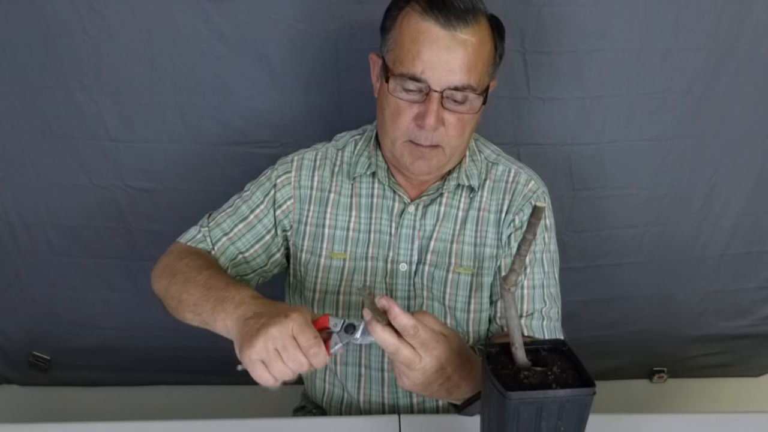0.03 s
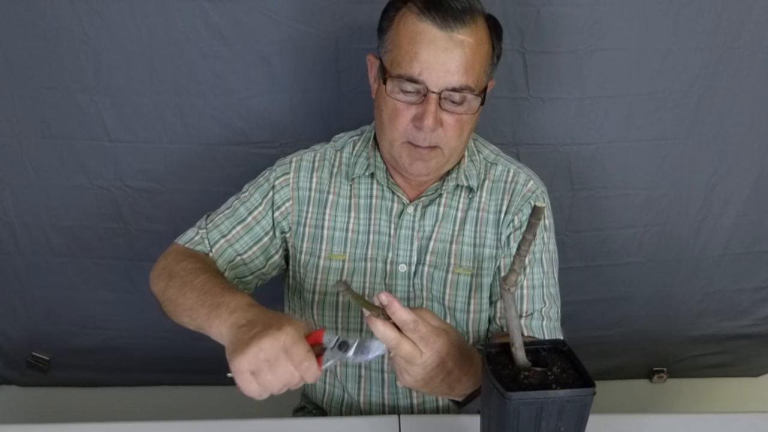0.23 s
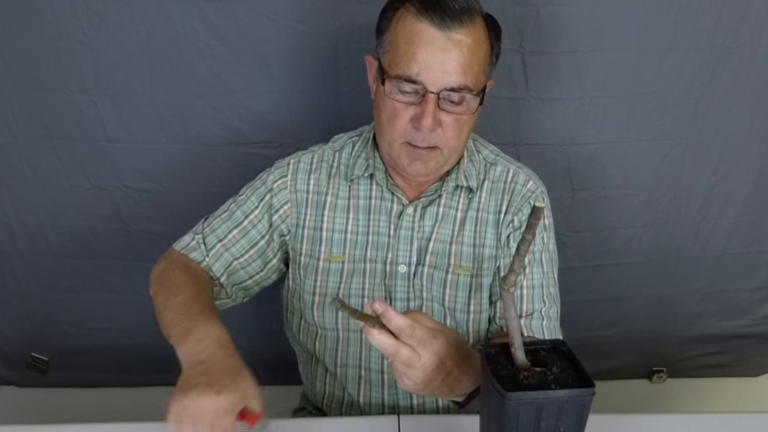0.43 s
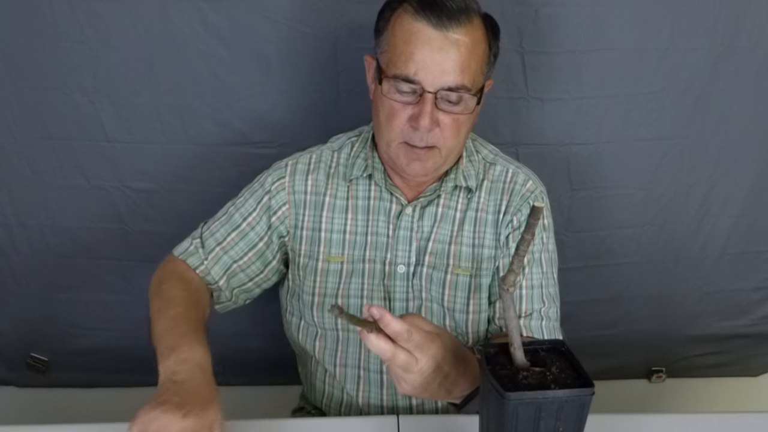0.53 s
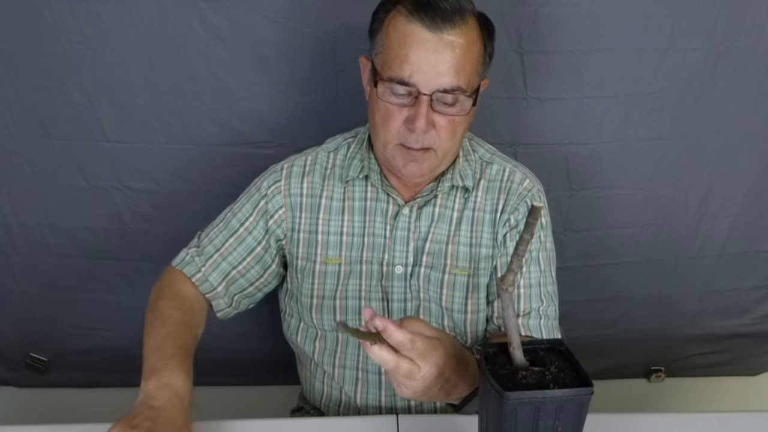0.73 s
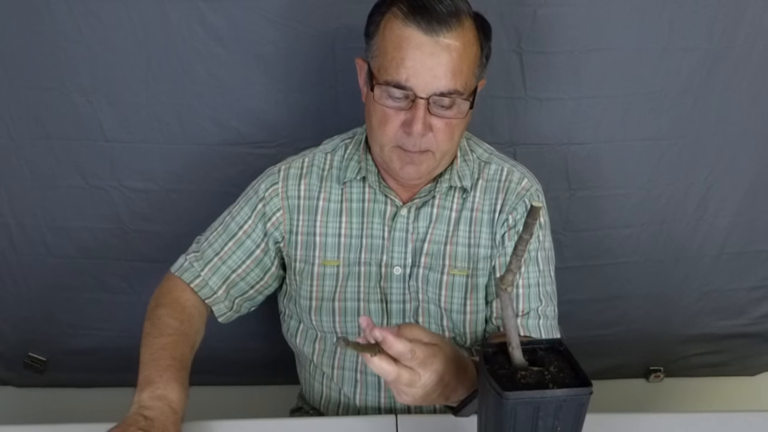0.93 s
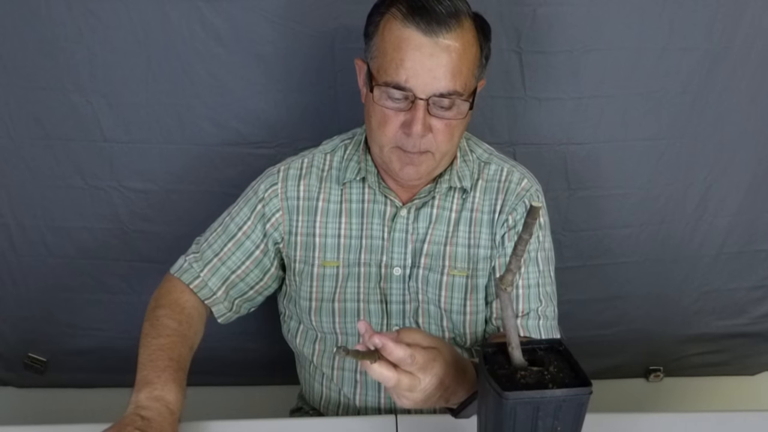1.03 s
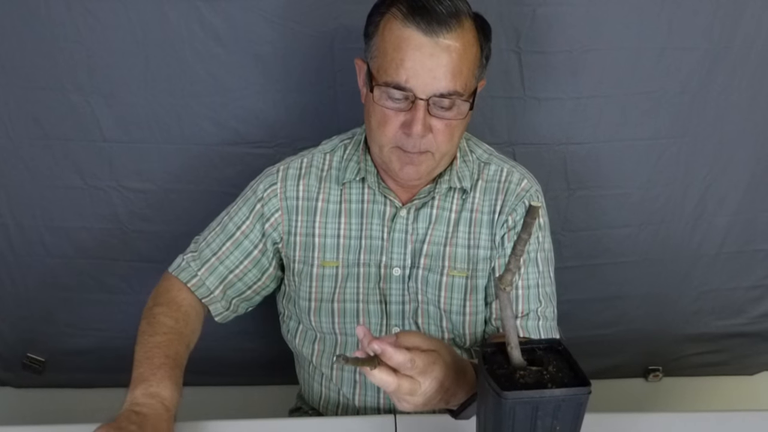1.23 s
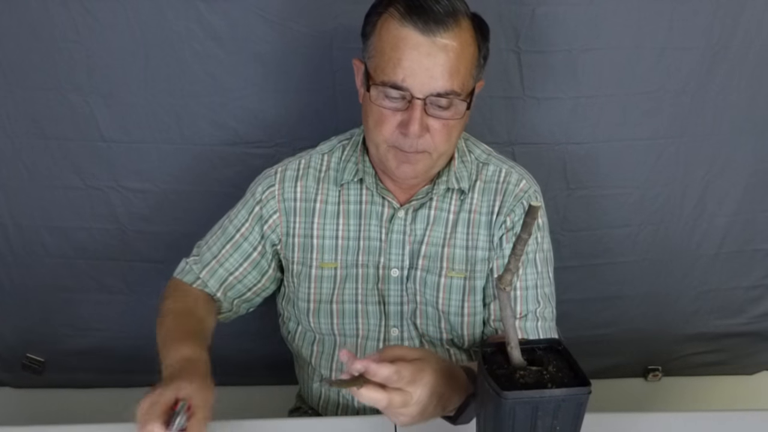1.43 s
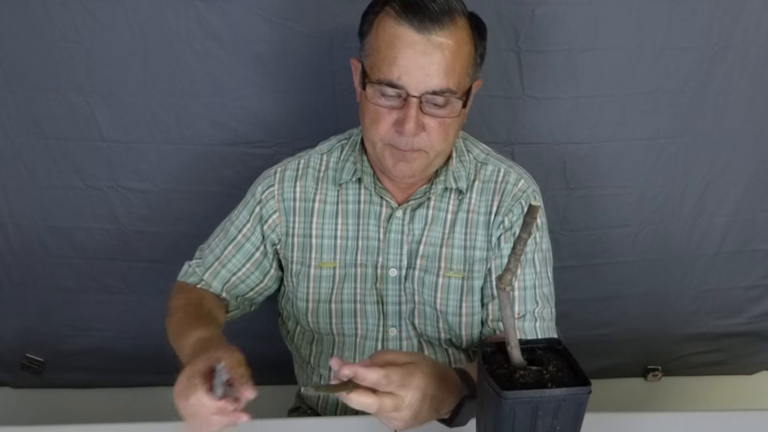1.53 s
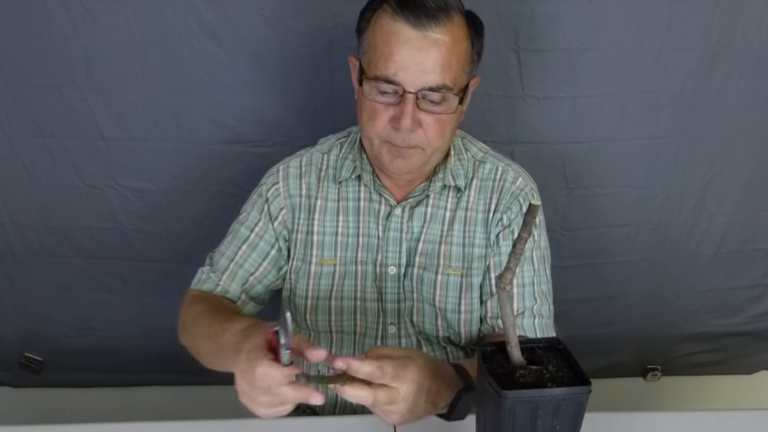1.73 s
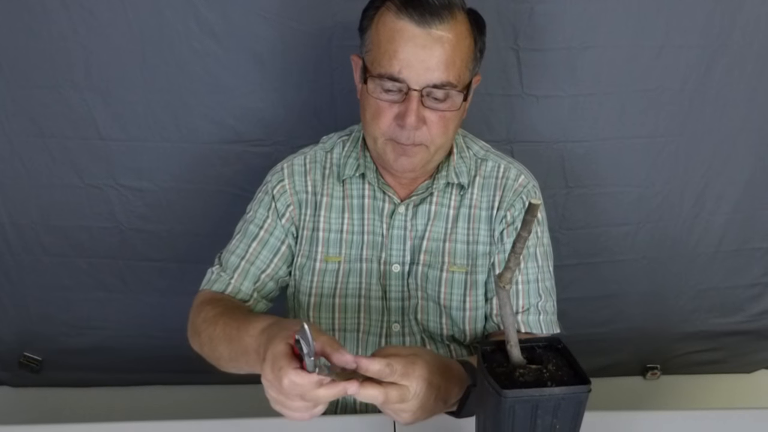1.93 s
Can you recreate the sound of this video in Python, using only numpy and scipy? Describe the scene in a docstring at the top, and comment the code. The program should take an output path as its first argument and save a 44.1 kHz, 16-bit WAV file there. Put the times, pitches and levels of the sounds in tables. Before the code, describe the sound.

Hand shears cut a woody cutting: a faint crackly bite at 0.08 seconds, a brief fibre crunch, then a loud, sharp metallic snap at 0.25 with a bright room echo. Around 1.0 the tool lands on a light hollow table with soft knocks; a faint knock at 1.2, a dull scraping drag around 1.35-1.45, then a small knife click at 1.54. Quiet ventilation and hiss throughout, close microphone.

```python
"""A bare, echoing room: hand shears bite into a woody cutting and snap shut, the tool is laid on
a light hollow table, a knife is dragged off it and clicks open; faint room noise below.
Steel contacts are noise bursts plus decaying sines; the crushed fibres are rough noise.
Knocks and random slips ring the table resonances, grit hisses with the slips, and decaying
noise bands echo tools and table; the air is wavering noise bands."""
import sys
import numpy as np
from scipy import signal
from scipy.fft import rfft, irfft
from scipy.io import wavfile
from scipy.ndimage import uniform_filter1d

SR = 44100
rng = np.random.default_rng(int(sys.argv[2]) if len(sys.argv) > 2 else 0)


def store_wav(level_fs):
    """Save 16-bit WAV to argv[1]."""
    pcm = np.round(np.clip(np.atleast_2d(level_fs), -1, 1) * 32767)
    wavfile.write(sys.argv[1], SR, pcm.T.astype(np.int16))


def volts_from_db(level):
    """Convert decibel levels to linear amplitude ratios."""
    exponent = np.asarray(level, float) / 20
    return 10 ** exponent


N = 88200


def rms_one(x):
    """Scales to rms 1."""
    return x / np.sqrt(np.mean(x ** 2) + 1e-20)


def at_hz(points, hz):
    """Reads a frequency table, linear in log frequency."""
    table_hz, values = np.transpose(points)
    return np.interp(np.log(hz), np.log(table_hz), values)


def in_time(rows):
    """Level columns over time, -120 dB outside the table."""
    s, *columns = np.transpose(rows)
    return [np.interp(np.arange(N) / SR, s, c, left=-120, right=-120) for c in columns]


def low_pass(x, hz):
    """Third-order low-pass: dulls the treble."""
    return signal.sosfilt(signal.butter(3, hz, fs=SR, output="sos"), x)


def cut(x, hz, kind="high"):
    """Fourth-order high- or low-pass."""
    return signal.sosfilt(signal.butter(4, hz, kind, fs=SR, output="sos"), x)


def soften(x, hz):
    """Double one-pole low-pass: a soft contact."""
    r = np.exp(-2 * np.pi * hz / SR)
    return signal.lfilter([(1 - r) ** 2], [1, -2 * r, r * r], x)


def ring(clicks, hz, t60_s):
    """Two-pole resonator: a unit click starts a decaying sine of height 1."""
    r, w = volts_from_db(-60 / (t60_s * SR)), 2 * np.pi * hz / SR
    return signal.lfilter([0, np.sin(w)], [1, -2 * r * np.cos(w), r * r], clicks + 1e-18)


def coloured(spectrum):
    """Mono noise of a given spectrum, rms 1."""
    hz = np.arange(N // 2 + 1) * SR / N + 1
    white = rfft(rng.standard_normal(N))
    return rms_one(irfft(white * volts_from_db(at_hz(spectrum, hz)), N))


def bands(likeness):
    """Third-octave bands of stereo noise, with their centres; likeness sets mid against side."""
    edges_hz = 25 * 2 ** np.arange(0, 9.4, 1 / 3)
    white = rng.standard_normal((2, 2, N))
    for k, (low, high) in enumerate(zip(edges_hz, edges_hz[1:])):
        band_pass = signal.butter(2, [low, high], "band", fs=SR, output="sos")
        mid, side = signal.sosfilt(band_pass, white[k % 2])
        hz = np.sqrt(low * high)
        alike = np.clip(at_hz(likeness, hz), -1, 1)
        yield hz, np.sqrt(1 + alike) * mid + np.sqrt(1 - alike) * side * [[1], [-1]]


def drift(rate_hz):
    """Slow low-passed chance, spread 1, drawn every 40 samples."""
    r = np.exp(-80 * np.pi * rate_hz / SR)
    slow = signal.lfilter([1], [1, -2 * r, r * r], rng.standard_normal(N // 40 + 2002))
    slow = slow[2000:]  # drop the start-up
    return np.interp(np.arange(N) / 40, np.arange(len(slow)), rms_one(slow))


# air spectrum: (frequency [Hz], relative density [dB per Hz])
AIR_SPECTRUM = [(25, -25.5), (50, -24), (85, -15), (120, -2.5), (155, -9), (200, 1), (320, -2.5), (500, -7),
                (800, -8), (1300, -14.5), (2500, -16), (5000, -20.5), (10000, -22), (13000, -31),
                (15500, -49)]
# air stereo: (frequency [Hz], left-right likeness [-1..1])
AIR_ALIKE = [(40, 0.62), (120, 0.33), (300, 0.78), (800, 0.2), (2500, 0.059), (8000, 0.27), (15000, 0.41)]
AIR_DB, AIR_PATCHY_DB = -56.5, 1.3


def air():
    """Low ventilation rumble and microphone hiss: noise bands, each wavering a little."""
    together = drift(2.5)
    noise = 0
    for hz, band in bands(AIR_ALIKE):
        waver_db = AIR_PATCHY_DB * (.5 * together + drift(8))
        noise = noise + volts_from_db(at_hz(AIR_SPECTRUM, hz) + waver_db) * band
    return volts_from_db(AIR_DB) * rms_one(noise)


# crack noise: (frequency [Hz], relative density [dB per Hz])
CRACK_SPECTRUM = [(300, -33), (1000, 0.5), (2000, 2), (2500, -5.5), (4000, -7), (5500, -7), (8500, -9.5),
                  (11000, -6.5), (14000, -12.5), (16000, -16.5)]
STRENGTH_SPREAD_DB, PHASE_SPREAD_RAD = 1.5, .6
RING_RISE_S, TILT_FROM_HZ = .0007, 1500
TABLE_ECHO_S, TABLE_ECHO_DB = .0062, -28


def contacts(clicks, modes):
    """Each contact is a short crack and sets every resonance ringing; the table throws it back once."""
    t = np.arange(2400) / SR
    each = len(clicks), len(modes)
    phase = np.pi * np.arange(len(modes)) + PHASE_SPREAD_RAD * rng.standard_normal(each)
    chance_db = STRENGTH_SPREAD_DB * rng.standard_normal(each)
    out, crack = np.zeros(N), coloured(CRACK_SPECTRUM)
    for k, (s, ring_db, crack_db, burst_s, tilt) in enumerate(clicks):
        i = int(s * SR)
        shape = np.minimum(t / .0003, 1) * np.exp(-2 * t / burst_s)
        burst = shape * crack[i:i + len(t)]
        even = np.sqrt(np.sum(shape ** 2) / np.sum(burst ** 2))
        out[i:i + len(t)] += volts_from_db(crack_db) * even * burst
        for m, (hz, mode_db, t60_s) in enumerate(modes):
            fall = (1 - np.exp(-t / RING_RISE_S)) ** 2 * volts_from_db(-60 * t / t60_s)
            tilt_db = tilt * np.log2(max(hz, TILT_FROM_HZ) / 3000)
            level = volts_from_db(ring_db + mode_db + tilt_db + chance_db[k, m])
            out[i:i + len(t)] += level * fall / fall.max() * np.sin(2 * np.pi * hz * t + phase[k, m])
    lag = int(TABLE_ECHO_S * SR)
    return out + volts_from_db(TABLE_ECHO_DB) * np.concatenate([np.zeros(lag), out[:-lag]])


# blade contacts: (time [s], ring level [dB], crack level [dB], burst [s], tilt [dB per octave])
BITES = [(.0790, -42, -39, .006, 4), (.0812, -37.5, -43, .006, -4), (.0860, -40, -44, .008, 2.5),
         (.0925, -42.5, -43, .012, -6.5), (.1015, -44.5, -49, .008, -2.5)]
# wood resonances: (frequency [Hz], level [dB], t60 [s])
WOOD_MODES = [(1230, 5, .014), (1900, -4, .012), (2650, -11, .01), (3785, -8, 0.0084), (4465, -1.5, .005),
              (6540, -11, 0.0033), (11300, -6, 0.0012), (14800, -6, .003)]


def bites():
    """The blade's first bite: small contacts ring the wood."""
    return contacts(BITES, WOOD_MODES)


# decay: (frequency [Hz], t60 [s])
ROOM_T60 = [(120, 0.63), (400, 0.6), (1200, 0.6), (2300, 0.74), (5000, 0.62), (8000, 0.53), (12000, 0.26)]
# colour: (frequency [Hz], relative level [dB])
ROOM_COLOUR = [(120, -10), (400, 4.5), (1200, 2), (2300, 3.2), (3500, 3), (5000, 1.5), (8000, 4),
               (10000, 2.5), (12000, 3.5)]
# stereo: (frequency [Hz], left-right likeness [-1..1])
ROOM_ALIKE = [(100, 1), (300, 1), (800, 0.19), (2000, 0.71), (5000, .8), (12000, 0.2)]
ROOM_ONSET_S = 0.0014


def room(x):
    """Dense reflections that build quickly and die band by band, equally strong on both sides."""
    t, tail = np.arange(N) / SR, 0
    for hz, band in bands(ROOM_ALIKE):
        onset = np.clip(t / ROOM_ONSET_S - .5, 0, 1)
        fall = volts_from_db(-60 * t / at_hz(ROOM_T60, hz)) * onset
        energy = np.sum((fall * band) ** 2, axis=1, keepdims=True)
        even = np.sqrt(hz * np.sum(fall ** 2) / energy)
        tail = tail + volts_from_db(at_hz(ROOM_COLOUR, hz)) * even * fall * band
    tail = tail / np.sqrt(np.sum(tail ** 2) / 2)  # unit energy per side
    return signal.fftconvolve(x[None], tail, axes=1)[:, :N]


# blade creeping through the fibres: (time [s], level [dB])
CRUSH = [(.2, -66), (.222, -44), (.235, -35.5), (.244, -32.5), (.247, -22), (.25, -82)]


def crush():
    """Fibres crackle under the blade: crack noise with a rough random envelope."""
    crush_db, = in_time(CRUSH)
    rough = rms_one(uniform_filter1d(rng.exponential(1, N) ** 2, size=90))
    return volts_from_db(crush_db) * coloured(CRACK_SPECTRUM) * rough


# steel contacts: (time [s], ring level [dB], crack level [dB], burst [s], tilt [dB per octave])
SNAP_CLICKS = [(.2474, -21, -16, 0.0048, 0.5), (.2490, -20, -22, 0.005, -0.5), (.2538, -8.5, -4, 0.0018, 4),
               (.2585, -21, -17.5, 0.0044, -5.5), (.2608, -21, -19, .003, -3.5),
               (.2640, -23.5, -26, .003, -4), (.2660, -24.5, -25, .005, -7)]
# blade and handle resonances: (frequency [Hz], level [dB], t60 [s])
SHEARS_MODES = [(272, -2.5, 0.048), (401, 3, 0.017), (600, 1.5, 0.022), (713, 0, 0.013), (849, 3.5, 0.02),
                (1292, 0.5, 0.005), (1680, -4, 0.00971), (1907, 0.5, 0.009), (2276, -2, .007),
                (2475, -1.5, 0.0046), (3393, -4.5, .005), (4083, -12, .004), (5002, -4, 0.0065),
                (5587, -9.5, .004), (6640, -12, .003), (7970, -21.5, .003), (10000, -11.5, .0025)]


def snap():
    """The shears snap shut: steel contacts ring blades and handles."""
    return contacts(SNAP_CLICKS, SHEARS_MODES)


# treble puffs: (time [s], level [dB], half-length [s])
RUSTLES = [(0.82, -65, 0.0085), (1.31, -72, 0.011), (1.446, -61, 0.039)]


def rustles():
    """Short soft puffs of high noise."""
    t = np.arange(N) / SR
    band_pass = signal.butter(2, (5400, 10600), "band", fs=SR, output="sos")
    hiss = rms_one(signal.sosfilt(band_pass, rng.standard_normal(N)))
    return hiss * sum(volts_from_db(db) * np.exp(-((t - s) / half_s) ** 2) for s, db, half_s in RUSTLES)


SLIPS_PER_S, SLIP_SPREAD_DB = 1700, 2


def slip_clicks():
    """A steady random stream of slips of either sign."""
    happens = rng.random(N) < SLIPS_PER_S / SR
    strength = volts_from_db(SLIP_SPREAD_DB * np.minimum(rng.exponential(1, N), 3))
    return happens * strength * rng.choice([-1, 1], N)


# table-top resonances: (frequency [Hz], level [dB], t60 [s])
TABLE_MODES = [(146.4, -11, 0.28), (206.1, -10, 0.44), (265, 2, 0.046), (323.6, -2.5, 0.075),
               (382, -3, 0.031), (495.6, -6, 0.031), (545.5, 0, 0.023), (676, -9.5, 0.069),
               (810, -7.5, 0.02), (1250, -49, 0.0089)]


def table_rings(force):
    """A force on the table top rings all its resonances."""
    return sum(ring(volts_from_db(db) * force, hz, t60_s) for hz, db, t60_s in TABLE_MODES)


# hand and tools rubbing on the table: (time [s], level [dB], grit level [dB])
DRAG = [(.978, -33.5, -57), (.99, -38, -56), (1.03, -40.5, -59.5), (1.065, -43.5, -61), (1.1, -51, -65.5),
        (1.17, -60, -66.5), (1.2, -40, -63), (1.23, -52.5, -68), (1.3, -45, -67.5), (1.335, -50, -60),
        (1.352, -32, -47), (1.375, -25.5, -38.5), (1.40, -29.5, -52.5), (1.445, -35.5, -48),
        (1.48, -59, -55), (1.56, -47, -56.5), (1.62, -71, -64)]
SLIP_SOFT_HZ, RUB_EVEN_HZ = 883, 24.7


def rub(slips):
    """Softened slips ring the table, evened out so that the level follows the drag."""
    drag_db, _ = in_time(DRAG)
    force = soften(slips, SLIP_SOFT_HZ)
    steady = table_rings(force)
    power_ahead = soften(steady[::-1] ** 2, RUB_EVEN_HZ)[::-1]
    return table_rings(force * volts_from_db(drag_db) / np.sqrt(power_ahead + 0.033 * steady.var()))


# grit noise: (frequency [Hz], relative density [dB per Hz])
GRIT_SPECTRUM = [(500, -1), (1000, 3.5), (2200, 0), (3600, -2), (5500, -14), (9000, -23.5), (13000, -43)]


def grit(slips):
    """Noise hisses with each slip."""
    _, grit_db = in_time(DRAG)
    gate = rms_one(soften(np.abs(slips), hz=99.5))
    return volts_from_db(grit_db) * gate * coloured(GRIT_SPECTRUM)


# knocks: (time [s], level [dB], most responsive frequency [Hz], tick level [dB])
KNOCKS = [(0.9783, -33.5, 350, -61), (0.9932, -36.5, 337, -80), (1.007, -33, 280, -67),
          (1.191, -40.5, 354, -73), (1.356, -30, 310, -56)]
THUD_PEAK_S = 0.0029


def thuds():
    """Each knock is first a short swelling thud at its own pitch."""
    out = 0
    for s, db, hz, _ in KNOCKS:
        age = np.maximum(np.arange(N) / SR - s, 0)
        swell = (age / THUD_PEAK_S * np.exp(1 - age / THUD_PEAK_S)) ** 2
        out = out + volts_from_db(db) * swell * np.sin(2 * np.pi * hz * age)
    return out


TABLE_RINGS_DB, KNOCK_FALL_DB_PER_OCT, KNOCK_SOFT_HZ = -10.5, 11, 540


def knock_rings():
    """Soft knocks ring the table resonances, most those near each knock's own pitch."""
    out = 0
    for hz, _, t60_s in TABLE_MODES:
        knocks = np.zeros(N)
        for s, db, centre_hz, _ in KNOCKS:
            fall_db = KNOCK_FALL_DB_PER_OCT * abs(np.log2(hz / centre_hz))
            knocks[int(s * SR)] = volts_from_db(db + TABLE_RINGS_DB - fall_db)
        push = np.gradient(soften(knocks, KNOCK_SOFT_HZ)) * SR / (2 * np.pi * hz)
        out = out + ring(push, hz, t60_s)
    return out


def ticks():
    """Each knock adds a decaying tick of grit noise."""
    starts, fall_s = np.zeros(N), 0.0072
    for s, _, _, tick_db in KNOCKS:
        starts[int(s * SR)] = volts_from_db(tick_db)
    return signal.lfilter([1], [1, -np.exp(-1 / (fall_s * SR))], starts) * coloured(GRIT_SPECTRUM)


def table():
    """Rubbing, grit and knocks on the table top; one stream of slips drives rub and grit."""
    slips = slip_clicks()
    return rub(slips) + grit(slips) + thuds() + knock_rings() + ticks()


# knife contacts: (time [s], ring level [dB], crack level [dB], burst [s], tilt [dB per octave])
KNIFE_CLICKS = [(1.5370, -34.5, -35, 0.0013, 0.11), (1.5430, -44, -36.5, 0.0029, 0.1)]
# knife resonances: (frequency [Hz], level [dB], t60 [s])
KNIFE_MODES = [(1206, 6.5, 0.075), (1970, 5.5, 0.015), (2530, -1, 0.0056), (3330, -2.5, 0.0037),
               (4080, 3, 0.0023), (4870, -2.5, 0.0023), (6430, -4, 0.0017), (9040, -13, 0.00078)]
KNIFE_DULL_HZ = 8250


def knife():
    """The duller knife clicks open."""
    return low_pass(contacts(KNIFE_CLICKS, KNIFE_MODES), KNIFE_DULL_HZ)


GAP_HZ, GAP_SHARPNESS, SNAP_TOP_HZ = 1050, 8.2, 13100
STEEL_CUT_HZ, STEEL_BASS_DB = 2197, -25.5


def steel():
    """Shears and knife; both radiate little below the blade resonances."""
    closing = low_pass(snap() + crush(), SNAP_TOP_HZ)
    # nothing radiates between handle and blade resonances
    closing = signal.lfilter(*signal.iirnotch(GAP_HZ, GAP_SHARPNESS, SR), closing)
    both = bites() + closing + knife()
    return cut(both, STEEL_CUT_HZ) + volts_from_db(STEEL_BASS_DB) * cut(both, STEEL_CUT_HZ, "low")


# tool balance: (frequency [Hz], left minus right [dB])
TOOL_BALANCE = [(1000, 0), (2000, 0), (4500, 2), (8000, 2), (12000, -4.5), (16000, -3.5)]
STEEL_LOW_HZ, TABLE_LOW_HZ = 230, 158
TOOLS_ROOM_DB, TABLE_ROOM_DB = -5, -8


def scene():
    """Tools and table near the microphone, their echo, the air; little comes through below a few hundred hertz."""
    tools = cut(steel(), STEEL_LOW_HZ)
    top = cut(table(), TABLE_LOW_HZ) + rustles()
    near = tools + room(volts_from_db(TOOLS_ROOM_DB) * tools)
    lean_db = at_hz(TOOL_BALANCE, np.arange(N // 2 + 1) * SR / N + 1) / 2
    sides = irfft(rfft(near) * volts_from_db(lean_db * [[1], [-1]]), N)
    return sides + top + room(volts_from_db(TABLE_ROOM_DB) * top) + air()


def band_limit(x):
    """A steep low-pass at the top of the band."""
    return signal.sosfilt(signal.butter(12, 16450, fs=SR, output="sos"), x)


def record(dry):
    """Steep low-pass, 70 dB down from 16.2 kHz up."""
    mix = signal.sosfilt(signal.cheby2(12, 70, 16200, fs=SR, output="sos"), dry)
    return band_limit(mix)


dry = scene()
out = record(dry)
store_wav(out)
```